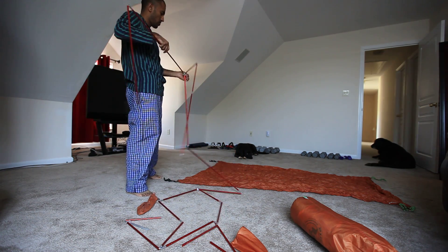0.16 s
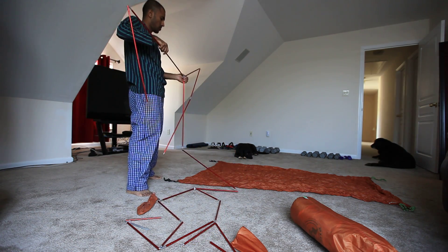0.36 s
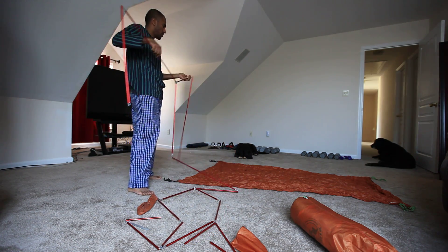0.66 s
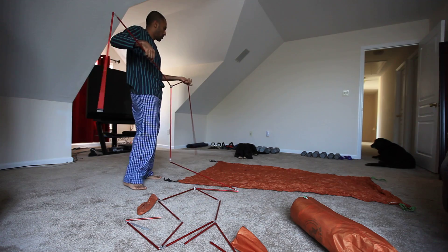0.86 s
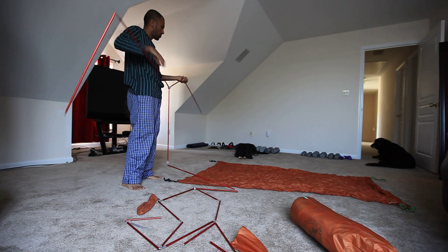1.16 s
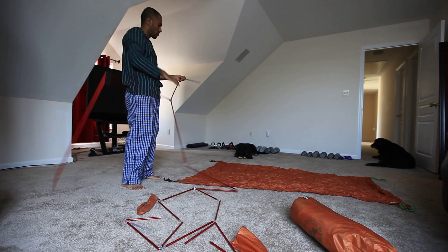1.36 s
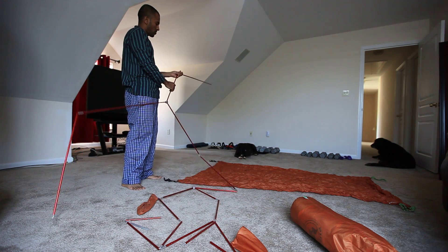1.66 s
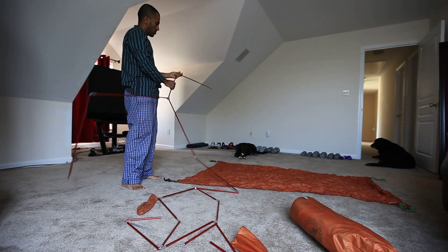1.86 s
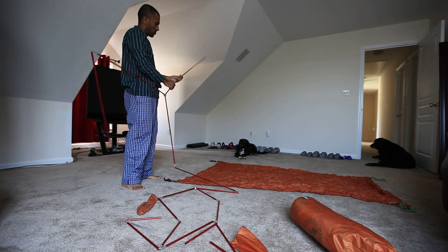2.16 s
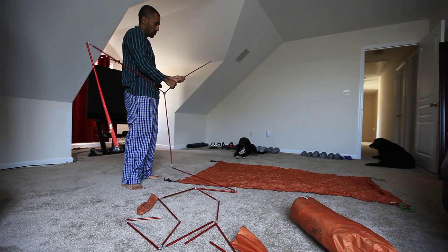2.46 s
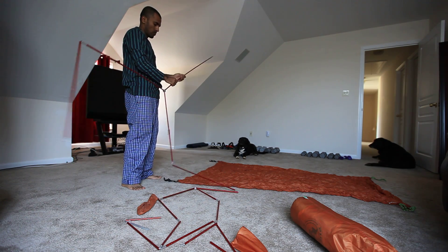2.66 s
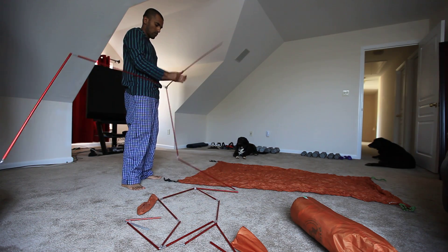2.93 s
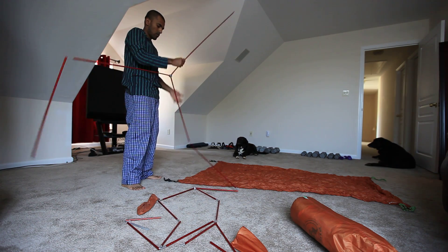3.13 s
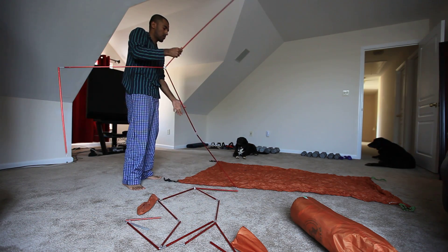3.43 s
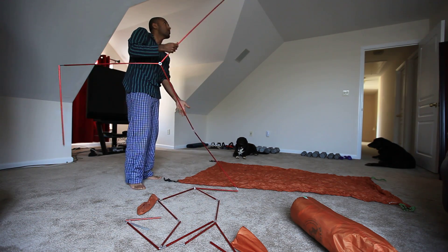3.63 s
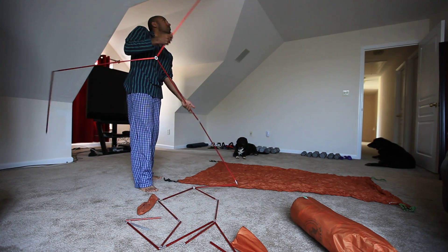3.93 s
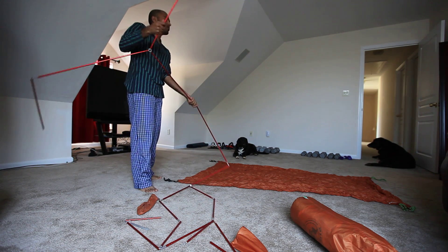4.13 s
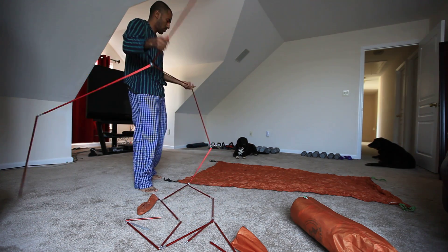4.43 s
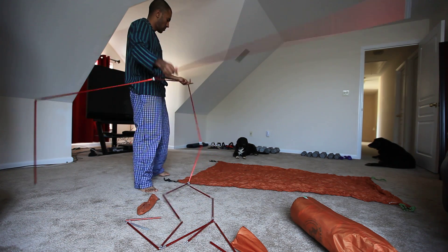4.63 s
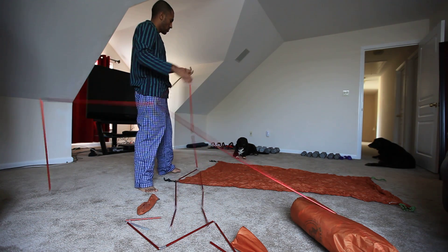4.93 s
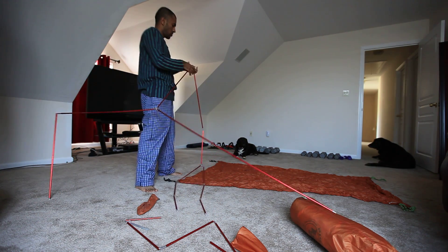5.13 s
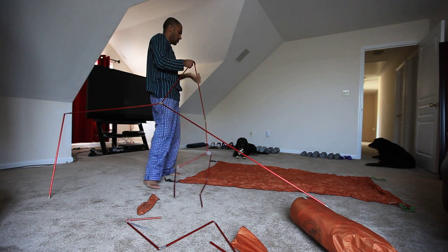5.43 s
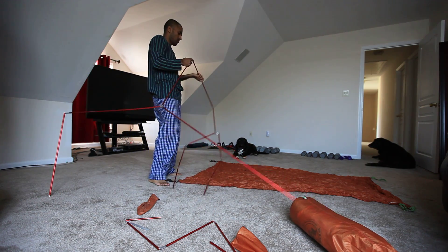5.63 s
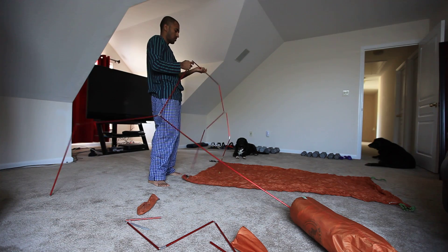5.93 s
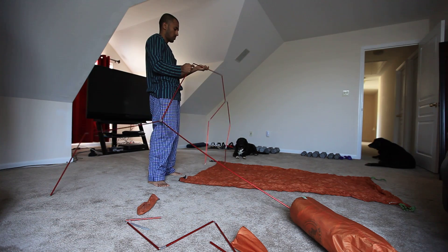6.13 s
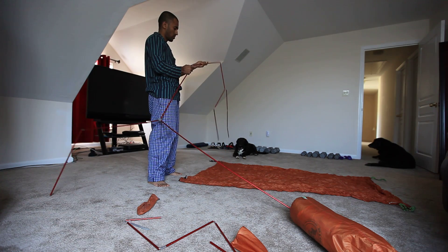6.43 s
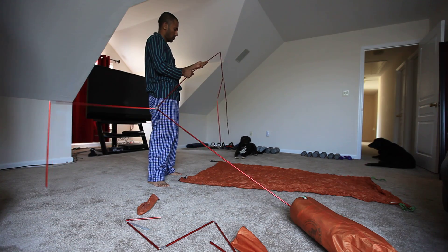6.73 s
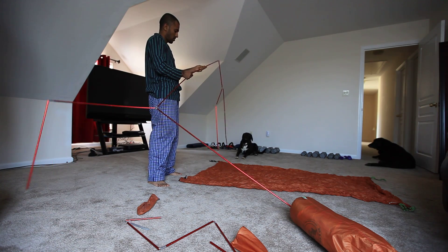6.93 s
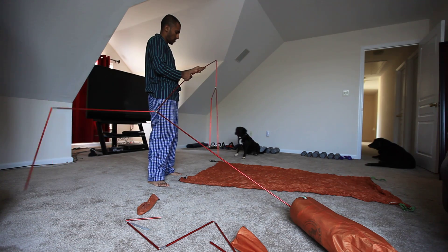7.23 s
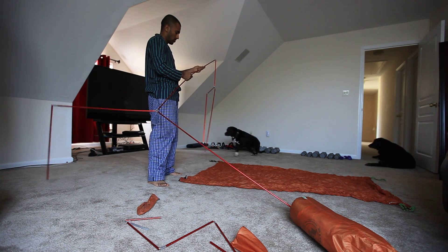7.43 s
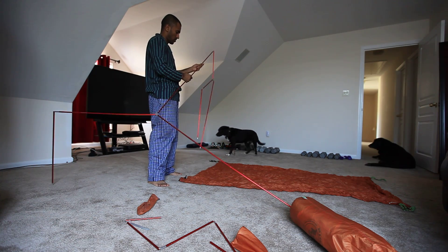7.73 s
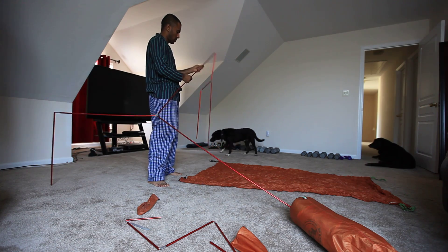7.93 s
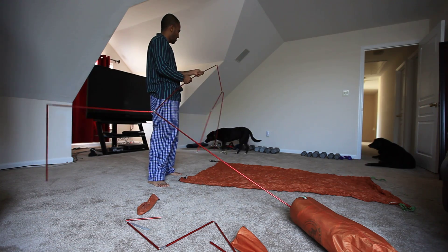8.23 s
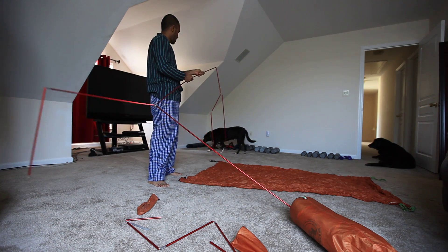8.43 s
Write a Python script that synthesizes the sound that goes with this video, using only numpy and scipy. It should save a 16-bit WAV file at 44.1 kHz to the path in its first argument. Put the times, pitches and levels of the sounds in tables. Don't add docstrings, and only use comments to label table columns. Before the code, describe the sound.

In a carpeted attic room, thin metal tent pole sections snap together a few metres from a small camera microphone. Sharp bright clicks come first, then sparse ticks and faint dog-tag tinkles, another snap, a short tube slide, and a busy clatter with soft thuds and nylon rustle. The hardest snap follows, then a last few clicks, leaving tiny tag jingles over a low house hum.

```python
import sys
import numpy as np
from scipy import signal
from scipy.fft import rfft, irfft
from scipy.io import wavfile
from scipy.ndimage import uniform_filter1d

SR = 44100
rng = np.random.default_rng(int(sys.argv[2]) if len(sys.argv) > 2 else 0)


def wav_record(signal):
    frames = np.transpose(np.atleast_2d(signal))
    bounded = np.clip(frames, -1, 1)
    quanta = np.round(bounded * 32767).astype(np.int16)
    wavfile.write(sys.argv[1], SR, quanta)


def volts_from_db(level):
    exponent = np.asarray(level, float) / 20
    return 10 ** exponent


N = 378378
SIZE = 2048
TIME_S = np.arange(N) / SR


def unit(x, count=None):
    return x / np.sqrt(np.mean(x[..., :count] ** 2, axis=-1, keepdims=True))


def ring(f, hz, width):
    return 1j * f * width / (hz ** 2 - f ** 2 + 1j * f * width)


def shape(x, response):
    size = x.shape[-1]
    return irfft(rfft(x) * response(np.fft.rfftfreq(size, 1 / SR) + 1e-3), size)


def colour(table):
    hz, db = np.transpose(table)
    return lambda f: volts_from_db(np.interp(np.log(f), np.log(hz), db))


def envelope_db(table):
    s, db = np.transpose(table)
    return np.interp(TIME_S, s, db, left=-200, right=-200)


def walk(rate_hz):
    k = int(SR / rate_hz)
    steps = np.repeat(rng.standard_normal(N // k + 1), k)
    return unit(uniform_filter1d(steps, k)[:N])


def place(times_s, rows):
    out = np.zeros(N + rows.shape[1])
    for s, row in zip(times_s, rows):
        start = int(s * SR)
        out[start:start + len(row)] += row
    return out[:N]


def grains(spread_db):
    size_db = spread_db * np.minimum(rng.exponential(size=N), 5)
    return unit(rng.standard_normal(N) * volts_from_db(size_db))


def causal(gain):
    cepstrum = irfft(np.log(gain + 1e-9))
    cepstrum[:, 1:SIZE // 2] *= 2
    cepstrum[:, SIZE // 2 + 1:] = 0
    return np.exp(rfft(cepstrum))


def room(x, count=6):
    # f/Hz, t60/s, level/dB
    decay_bands = [(400, 0.35, -2), (1430, 0.37, -4), (3130, 0.44, -7.5), (7100, 0.38, -9.5),
                   (10900, 0.76, -45.5), (14500, 0.22, -7)]
    hz, t60_s, db = np.transpose(decay_bands)[..., None]
    t = np.arange(8 * SIZE) / SR
    uneven_db = 2.5 * walk(700.)[:len(t)] * np.exp(-t / .06)
    onset = np.clip((t - .002) / .004, 0, 1)
    lumps = volts_from_db(uneven_db + 4 * np.exp(-t / .02)) * onset
    spot = np.arange(N) // (4 * SIZE) % count
    out = 0
    for k in range(count):
        noise = rng.standard_normal((len(hz), len(t)))
        bands = shape(noise, lambda f: ring(f, hz, 1.46 * hz) ** 2)
        fading = volts_from_db(db - 60 * t / t60_s) * bands / np.sqrt(t60_s * SR / 14)
        tail = lumps * np.sum(fading, axis=0)
        out = out + signal.fftconvolve(x * (spot == k), tail)[:N]
    return out


def gain_control():
    # t/s, depth/dB
    gain_drops = [
        (0, -5.5),
        (.26, -6.5),
        (0.677, -11.5),
        (1.651, -1.5),
        (2.65, -3.5),
        (4.73, -3.5),
        (5.722, -14),
        (6.973, -10.5),
        (7.169, -11),
    ]
    hold_s, recover_s = 0.11, 1
    gain_db = 0
    for s, depth_db in gain_drops:
        recovery = np.exp(-np.maximum(TIME_S - s - hold_s, 0) / recover_s)
        gain_db = gain_db + depth_db * (TIME_S >= s) * recovery
    return gain_db


def house():
    # f/Hz, width/Hz, level/dB
    rumble_modes = [(76.8, 6.2, -2), (86.3, 12, 3), (119.1, 3.8, 4), (217.4, 27, -10.5), (287.3, 39, -8)]
    # f/Hz, level/dB per Hz
    air_spectrum = [(12, -36), (20, 3.5), (44, -8.5), (88, -0.5), (204, -17.5), (301, -16.5), (678, -24.5),
                    (1090, -23), (2320, -30.5), (2910, -27.5), (3740, -29), (6910, -24.5), (11000, -37.5),
                    (16000, -38)]
    # t/s, level/dB
    motor_level = [
        (7.75, -93),
        (8.0, -55),
        (8.58, -57),
    ]
    house_db, hiss_db, hiss_ducks = -44.5, -54.5, 0.7
    gain_db = gain_control()
    drone = volts_from_db(1.5 * walk(2.5)) * np.sin(2 * np.pi * 34.8 * TIME_S + .6 * walk(2.2))
    rumble = unit(shape(rng.standard_normal(N),
                        lambda f: sum(volts_from_db(db) * ring(f, hz, width) for hz, width, db in rumble_modes)))
    air = shape(rng.standard_normal(N), colour(air_spectrum))
    hiss = shape(air, lambda f: f ** 2 / (f ** 2 + 550.0 ** 2))
    motor = volts_from_db(envelope_db(motor_level)) * np.sin(2 * np.pi * 143. * TIME_S)
    whine = volts_from_db(-22.5) * np.sin(2 * np.pi * 2910. * TIME_S + walk(8.))
    low = volts_from_db(2.0) * drone + volts_from_db(-1.5) * rumble + volts_from_db(-4.5) * unit(air - hiss)
    high = unit(hiss) + whine
    return volts_from_db(house_db + gain_db) * low + volts_from_db(hiss_db + hiss_ducks * gain_db) * high + motor


def tags():
    # t/s, peak/dB, large tag/dB, small tag/dB
    touches = [(1.928, -35, -20, -9), (1.9394, -41, -23, -16), (1.9593, -43, -25, -8),
               (2.17, -29, -21, -25), (2.174, -40, -25, -10), (2.205, -46, -25, -12),
               (2.334, -45, -25, -10), (2.3007, -38, -15, -5), (2.392, -40, -18, -30),
               (6.745, -52, -25, -8), (6.761, -39, -13, -31), (6.791, -43, -16, -16),
               (6.8049, -29, -20, -11), (6.9286, -27, -21.5, -9), (7.5526, -47, -13, -17),
               (7.5667, -41.5, -9.5, -9), (7.7688, -42.5, -19, -26.5), (7.791, -49, -4.5, -35),
               (7.8144, -58.5, -13, -26), (7.9172, -36, -17, -11), (7.925, -40, -4, 1),
               (7.9398, -28, -8.5, -33), (8.0598, -40, -10, -32), (8.116, -37.5, -18, -10),
               (8.1543, -32, -24, -17), (8.19, -52, -22, -15), (8.3268, -37, -10, -22),
               (8.3646, -43, -14, -9), (8.5152, -43, -6, -20), (8.522, -41, -3, -21),
               (8.5287, -34.5, -2, -18)]
    # f/Hz, level/dB, t60/s
    large_modes = [(6400, -9.5, 0.12), (6900, -15, .1), (7700, -12, 0.06)]
    # f/Hz, level/dB, t60/s
    small_modes = [(12600, 0, 0.0366), (12600, -14.5, .1), (15070, -16, .06)]
    s, db, large_db, small_db = np.transpose(touches)[..., None]
    own_hz = 6150 * (1 + 0.012 * rng.standard_normal((len(s), 1)))
    t = np.arange(4 * SIZE) / SR
    burst = volts_from_db(-60 * t / 0.026) * rng.standard_normal((len(s), len(t)))
    tick = shape(burst, lambda f: ring(f, 7200.0, 6760.0) ** 2 * ring(f, 12200.0, 9170.0))
    out = volts_from_db(-3.0) * tick + volts_from_db(large_db - 60 * t / 0.043) * np.sin(2 * np.pi * own_hz * t)
    for modes, disc_db in ((large_modes, large_db), (small_modes, small_db)):
        for hz, mode_db, t60_s in modes:
            chance = rng.standard_normal((len(s), 2))
            level = volts_from_db(disc_db + mode_db + 3.5 * chance[:, :1] - 60 * t / t60_s)
            detune = 1 + 0.0036 * chance[:, 1:]
            out = out + level * np.sin(2 * np.pi * hz * t * detune)
    return place(s[:, 0], volts_from_db(db + 1.5) * out * np.minimum(t / 0.00046, 1))


def pings():
    # t/s, level/dB, f/Hz, t60/s
    single_rings = [(.154, -36.5, 1686, 0.034), (0.268, -35.5, 2080, 0.16), (2.825, -45, 9360, .06),
                    (3.716, -43, 9460, 0.052), (3.718, -49, 11600, 0.086), (4.685, -51, 11800, 0.084),
                    (4.898, -54, 11400, .08), (6.76, -54, 2480, 0.08), (6.8, -62, 2490, .2),
                    (6.761, -57, 10900, 0.048), (6.761, -67, 13600, 0.11), (6.793, -57, 10800, .05),
                    (6.806, -50.5, 4230, 0.033), (6.93, -53, 4380, 0.061), (6.931, -61.5, 5140, .1),
                    (7.516, -70, 10700, 0.088), (7.516, -73, 13500, .08), (7.556, -63.5, 5150, 0.13),
                    (7.811, -66, 2520, 0.292), (6.762, -52, 6630, .06), (6.761, -61, 4300, .04),
                    (6.82, -61, 5140, .08), (7.57, -58, 6700, .15), (8.525, -51, 7650, 0.13),
                    (5.302, -48, 1930, 0.045), (5.472, -46, 1590, .05), (6.31, -56, 1550, 0.18),
                    (6.3, -53, 2780, .2)]
    s, db, hz, t60_s = np.transpose(single_rings)[..., None]
    t = np.arange(4 * SIZE) / SR
    blows = rng.standard_normal((len(s), len(t))) * volts_from_db(-60 * t / t60_s)
    rings = shape(blows, lambda f: ring(f, hz, 60.))
    return place(s[:, 0], volts_from_db(db) * unit(rings, count=600))


def rustle():
    # f/Hz, level/dB per Hz
    nylon_spectrum = [(1180, -43.5), (2000, -16.5), (2780, -3.5), (3680, -2), (5880, 1), (7440, 3),
                      (13700, -21.5), (16000, -22.5)]
    # loudest t/s, level/dB, swell/s, fade/s, dull share/dB
    drags = [(.15, -36.5, 0.53, .01, -13.5), (.672, -39, 0.14, .005, -16), (1.34, -52, 0.11, 0.091, -21),
             (1.489, -24, 0.038, 0.11, -15), (2.637, -23, 0.022, 0.01, -24), (3.85, -53, 0.16, 0.062, 7.5),
             (4.18, -32.5, 0.38, 0.11, -14.5), (4.44, -36.5, 0.12, 0.23, -15.5),
             (4.921, -28.5, 0.0016, 0.052, 5.5), (4.96, -19.5, 0.056, 0.15, -24),
             (5.1, -31, 0.046, 0.36, -11), (5.719, -26, 0.039, .006, -15), (5.961, -34, 0.0032, .05, -1.5),
             (5.99, -33.5, 0.022, 0.078, -8), (6.089, -29.5, 0.058, .09, -4.5),
             (6.17, -34, 0.058, 0.033, -5.5), (6.68, -52.5, 0.21, 0.089, -11), (6.84, -50, 0.13, .1, -7)]
    swell_db = 15
    crinkle = grains(2.5) * volts_from_db(2.2 * walk(120.) + 2.2 * walk(35.))
    bright = unit(shape(crinkle, colour(nylon_spectrum)))
    dull = unit(shape(crinkle, lambda f: ring(f, 1280.0, 2400.0) ** 2))
    out = 0
    for s, db, swell_s, fade_s, dull_db in drags:
        lost = np.where(TIME_S < s, (s - TIME_S) / swell_s, (TIME_S - s) / fade_s)
        level = volts_from_db(db - 7.0 - swell_db * np.minimum(lost, 10))
        out = out + level * (bright + volts_from_db(dull_db) * dull)
    return out


def thuds():
    # t/s, peak/dB, f/Hz, t60/s
    landings = [(1.446, -25.5, 400, 0.035), (1.459, -25, 268, .04), (1.476, -30, 333, 0.07),
                (1.492, -30, 322, .05), (1.517, -37, 264, .06), (4.3802, -23.5, 238, 0.03),
                (4.41, -39.5, 270, 0.047), (4.918, -19.5, 225, 0.032), (4.941, -23, 240, .05),
                (4.981, -20, 189, .05), (4.993, -24, 247, .05), (5.018, -27, 241, .06),
                (5.714, -37, 486, 0.021)]
    push_cycles, wobble_db, boom_db = 0.31, -14.5, -7.5
    s, db, hz, t60_s = np.transpose(landings)[..., None]
    t = np.arange(4 * SIZE) / SR
    wobble = volts_from_db(wobble_db - 60 * t / .06) * rng.standard_normal((len(s), len(t)))
    push = np.sin(np.pi * np.minimum(t * hz / push_cycles, 1)) + wobble
    width_hz = np.log(1000) / np.pi / t60_s
    boards = shape(push, lambda f: ring(f, hz, width_hz) * ring(f, hz, 740.0)
                   + volts_from_db(boom_db) * ring(f, 120., 90.0))
    return place(s[:, 0], volts_from_db(db) * boards / np.abs(boards).max(axis=1, keepdims=True))


def slide():
    # t/s, level/dB
    slide_level = [
        (3.8, -58.5),
        (3.892, -54.5),
        (4.1, -35),
    ]
    # f/Hz, width/Hz, level/dB
    tube_modes = [(2710, 80, 17.5), (3680, 160, 15), (4820, 18, -6.5), (5030, 110, 16), (5770, 100, 7),
                  (6550, 94, 21), (7200, 38, 6), (9000, 45, -24.5)]

    def response(f):
        modes = sum(volts_from_db(db) * ring(f, hz, width + 30.) for hz, width, db in tube_modes)
        return modes + volts_from_db(-3.) * ring(f, 5500., 6000.) ** 2

    return volts_from_db(envelope_db(slide_level) - 2.0) * unit(shape(grains(0.86), response))


def ferrules(rows):
    # f/Hz, level/dB
    crack_spectrum = [(150, -65), (500, -31.5), (1400, -22), (2000, -17), (3500, -8), (5000, -3.5),
                      (7500, -1), (9000, -9), (10500, -15), (13000, -24.5), (16500, -18.5)]
    # from t/s, to t/s, f/Hz, width/Hz, lift/dB
    joint_rings = [
        (0, 5.5, 9700, 500, 0),
        (.67, .7, 9900, 500, 7),
        (.67, .7, 8100, 900, 2),
        (.67, .7, 14500, 300, 13),
        (5.71, 5.73, 5200, 700, 2),
        (5.7, 7.3, 6800, 400, 2),
        (5.7, 7.3, 8900, 400, 7),
        (5.7, 7.3, 11300, 600, 11),
        (5.7, 7.3, 13900, 400, 6),
    ]
    # t/s, f/Hz, lift/dB
    struck_modes = [(.153, 6050, 2.5), (.153, 11430, 10), (.153, 13460, 6), (.153, 3680, -1),
                    (.248, 2640, 8), (.248, 3770, 2.5), (.248, 5450, 4), (.248, 6300, 4.5),
                    (.27, 3750, 3.5), (.27, 5140, 2), (.27, 7600, 4), (.27, 12340, 10), (.68, 6460, 3.5),
                    (.68, 7600, 2.5), (.68, 9500, 5.5), (.68, 11300, 3.5), (.68, 12200, 6),
                    (1.645, 5730, -1), (1.645, 7040, 4), (1.645, 10800, 6), (1.645, 12770, 10),
                    (2.655, 2820, 0), (2.655, 5440, 6.5), (2.655, 14700, 7), (3.831, 1530, 10),
                    (3.831, 6740, 11), (3.831, 7770, 4), (4.092, 1530, 5.5), (4.092, 2690, 3.5),
                    (4.092, 5000, 4.5), (4.092, 9400, 2), (4.092, 11670, 14.5), (4.39, 4080, -0.5),
                    (4.39, 6120, 3.5), (4.735, 7580, 5.5), (4.735, 6420, 2.5), (4.735, 5500, -1),
                    (4.94, 3180, -5), (4.94, 8650, 2), (5.02, 1520, 12.5), (5.02, 2090, 5.5),
                    (5.02, 2540, 8.5), (5.02, 5430, -0.5), (5.02, 7170, 9.5), (5.115, 1590, 10),
                    (5.115, 2750, 5), (5.72, 4510, 6.5), (5.72, 3170, -4), (5.72, 7400, 1.5),
                    (5.72, 10580, 12), (6.295, 1610, 8), (6.295, 2885, 1), (6.295, 6330, 2),
                    (6.295, 10400, 9), (6.975, 3020, 1.5), (6.975, 5250, 1.5), (7.17, 2500, 0.5),
                    (7.17, 6600, -1.5), (7.177, 7200, 2.5)]
    struck_reach_s, struck_width_hz = .016, 230.0
    tube_ring_hz, ring_scatter, ring_width_hz = 7450, 0.11, 2100.0
    s, db, upper_db, knock_db, chatter_ms = np.transpose(rows)[..., None]
    t, f = np.arange(SIZE) / SR, np.fft.rfftfreq(SIZE, 1 / SR) + 1

    chance = rng.standard_normal((len(s), 2, SIZE))
    patches = 4 * uniform_filter1d(chance[:, 1], size=16)
    blows = chance[:, 0] * volts_from_db(2 * patches - 60000 * t / np.maximum(chatter_ms, 3))
    rise_ms = np.where(db < -26, 1.0, 0.077)
    blows = blows * np.minimum((1000 * t + 0.01) / rise_ms, 1)
    even = uniform_filter1d(abs(rfft(blows)) ** 2, size=20) ** -.5

    lift = 1
    for start, end, hz, width, lift_db in joint_rings:
        lift = lift + ((s > start) & (s < end)) * volts_from_db(lift_db) * abs(ring(f, hz, width)) ** 2
    for at, hz, lift_db in struck_modes:
        near = abs(s - at) < struck_reach_s
        lift = lift + near * volts_from_db(lift_db) * abs(ring(f, hz, struck_width_hz)) ** 2
    own_hz = tube_ring_hz * (1 + ring_scatter * rng.standard_normal((len(s), 1)))
    own = abs(ring(f, own_hz, ring_width_hz)) ** 2

    top_tilt_db = (upper_db + 8.5) / (1 + (9700.0 / f) ** 12)
    body_tilt_db = (knock_db + 17.0) / (1 + (f / 4370.0) ** 4)
    tilt_db = top_tilt_db + body_tilt_db
    loose_hz = 1600 * 7 ** rng.random((len(s), 5, 1))
    loose = np.sum(abs(ring(f, loose_hz, 110.0)) ** 2, axis=1)
    freedom = np.where(db < -27, .5, .25)
    crack = even * colour(crack_spectrum)(f) * (1 + volts_from_db(3.5) * loose * freedom)

    toward = crack * volts_from_db(tilt_db) * (lift + volts_from_db(-4.5) * own)
    spread = crack * volts_from_db(0.67 * tilt_db) * (lift + volts_from_db(-3.0) * own)
    sounds = []
    for gain in (toward, spread):
        sound = shape(blows, lambda _: causal(gain))
        sounds.append(place(s[:, 0], volts_from_db(db - 3.0) * unit(sound, count=140)))
    return sounds


def contacts(light):
    top_db, body_db, body_loss = -14.5, -15.5, 1
    return [(s, db, top_db + hard_db, body_db - body_loss * hard_db, ms) for s, db, hard_db, ms in light]


def clatter():
    # t/s, level/dB, hardness/dB
    knocks = [(4.9455, -24, -4), (4.9575, -21, -1), (4.968, -22, 2), (4.9785, -19.5, -1),
              (4.997, -21.5, -4.5), (5.039, -25, 3), (5.054, -27.5, 1), (5.083, -37, -13.5),
              (5.1085, -23.5, 0), (5.131, -25.5, -6.5), (5.141, -27.5, -1.5), (.2523, -18, -3.5),
              (.54, -45, 0), (.563, -45, 3), (1.993, -50.5, 10), (2.27, -50.5, 6), (3.861, -42.5, 13),
              (3.882, -41.5, 9.5), (4.102, -29, -0.5), (4.194, -35, -7.5), (5.7262, -21.5, -1),
              (6.838, -48.5, 14), (7.482, -52, 14.5), (7.893, -57, 3)]
    return ferrules(contacts([tuple(knock) + (20.0,) for knock in knocks]))


def snaps():
    # t/s, level/dB, top/dB, body/dB, chatter
    # t60/ms
    snaps_home = [(.1529, -9.5, -9, -14, 37), (.2398, -15.5, -27, -22.5, 15), (.2485, -10, -8, -26, 11),
                  (.2677, -10, -12.5, -12.5, 19), (.675, -7.5, -8, -20, 25),
                  (1.4757, -20.5, -10.5, -7.5, 66), (1.6448, -19.5, -23, -18, 28),
                  (2.6476, -8, -10, -6, 22), (4.092, -17, -7.5, -2.5, 14), (4.381, -19.5, -34.5, -21.5, 38),
                  (4.3948, -14, -37, -5, 30), (4.7297, -7.5, -4.5, -25.5, 15),
                  (4.7372, -11.5, -16.5, -30, 3.8), (4.932, -17, -17.5, -17.5, 10),
                  (5.0153, -11.5, -9, -17.5, 8), (5.1185, -17.5, -6, -33, 18),
                  (5.7194, -2.5, -2.5, -13.5, 14), (6.286, -17.5, -12, -26.5, 59),
                  (6.3017, -20, -18, -23, 26), (6.971, -5.5, 3, -15, 12), (6.9843, -19, -10.5, -17, 170),
                  (7.1646, -7.5, -6.5, -17.5, 19), (7.1774, -10, -2.5, -23.5, 20)]
    # t/s, level/dB, hardness/dB, chatter t60/ms
    bounces_and_echoes = [(.1728, -19.5, -3, 110), (.257, -28.5, -15, 38), (.6934, -17, 4.5, 10),
                          (1.4663, -21.5, -0.5, 66), (2.6531, -23.5, -13.5, 7.8), (2.6668, -16.5, 10, 43),
                          (4.3867, -23.5, -21.5, 60), (4.392, -12.5, 7, 16), (4.7354, -23.5, -2.5, 5.6),
                          (4.7433, -27.5, -37.5, 16), (4.9543, -30, 2.5, 60), (4.964, -18, 9, 15),
                          (4.9763, -24.5, -4, 18), (5.026, -23, -10.5, 28), (5.0471, -23.5, 6.5, 15),
                          (5.1103, -22.5, -7.5, 51), (5.739, -26, -1, 18), (6.2955, -32.5, -14, 16)]
    # t/s, level/dB, hardness/dB
    swing_ticks = [(.0655, -33.5, 5), (.884, -40, -9), (.9727, -46, -7), (.9793, -47.5, -15),
                   (1.2688, -43.5, 8.5), (1.3207, -44.5, 6.5), (1.43, -35.5, -7), (1.4527, -26.5, -11.5),
                   (1.4628, -26, -14.5), (1.78, -49, -15), (1.883, -40, -13), (1.9724, -42.5, 6.5),
                   (2.327, -48, -8.5), (2.4892, -40.5, -1), (2.5063, -43.5, 3), (2.785, -37, 5),
                   (2.8258, -35.5, -15), (2.8456, -25.5, -8.5), (2.922, -41, -1), (3.0015, -41.5, 4.5),
                   (3.1758, -34, -10.5), (3.273, -32, 16.5), (3.2823, -35.5, 7.5), (3.692, -49, -1.5),
                   (3.7169, -31, -12.5), (3.789, -44, 10), (3.8314, -34.5, -11)]
    # t/s, level/dB, hardness/dB
    lift_ticks = [(3.868, -41, -4), (4.063, -36, -7), (4.117, -27, 4), (4.179, -29.5, 8),
                  (4.2243, -36.5, 8), (4.2646, -36.5, 15), (4.3703, -36.5, 5), (4.5586, -37.5, 13.5),
                  (4.632, -34.5, 5), (4.6844, -30.5, -7), (4.707, -32.5, -6), (4.8496, -39, -9),
                  (4.86, -35, 3.5), (4.9291, -19, -9), (5.1386, -34, -11), (5.2, -41.5, -9),
                  (5.298, -41, -19), (5.4024, -46.5, -7), (5.4682, -37, -8.5), (5.6515, -41.5, -15.5),
                  (5.6975, -36.5, 0.5), (5.7098, -31, 4), (6.0521, -34, -10), (6.0561, -27, -3.5),
                  (6.3278, -27.5, 1), (6.936, -41, 10.5), (6.955, -37.5, 12), (6.9613, -34, 9.5),
                  (7.3867, -41.5, -11)]
    ticks = [tuple(tick) + (57.5,) for tick in list(swing_ticks) + list(lift_ticks)]
    return ferrules(list(snaps_home) + contacts(list(bounces_and_echoes) + ticks))


def scene():
    toward, spread = np.add(snaps(), clatter())
    near = thuds() + rustle() + slide()
    collar = tags() + pings()
    echo = room(spread + near + volts_from_db(-1.5) * collar)
    return (toward + near + collar + echo + house())[None]


def low_pass(x):
    return signal.sosfilt(signal.butter(12, 16190, fs=SR, output="sos"), x)


def record(dry):
    ported = shape(dry, lambda f: 1 / (1 + (f / 15000.0) ** 12))
    loud = np.clip(ported, -1, 1)
    mix = np.clip(loud - 0.13 * loud ** 4, -1, 1)
    return low_pass(mix)


dry = scene()
out = record(dry)
wav_record(out)
```